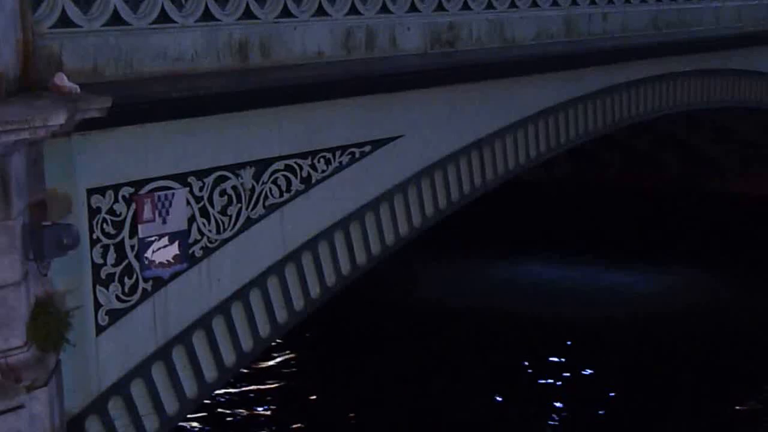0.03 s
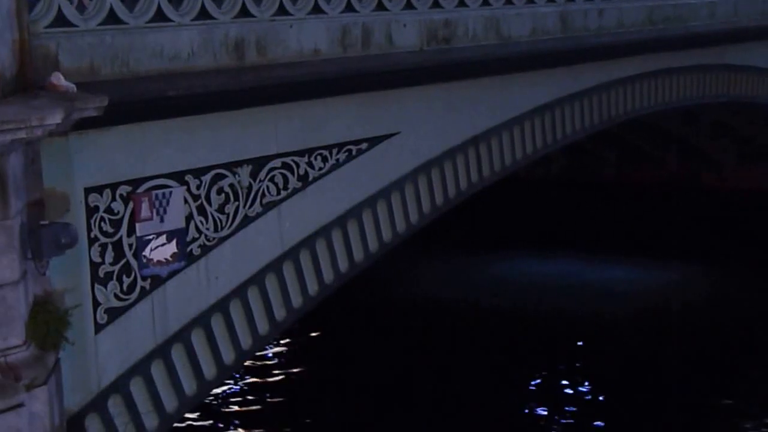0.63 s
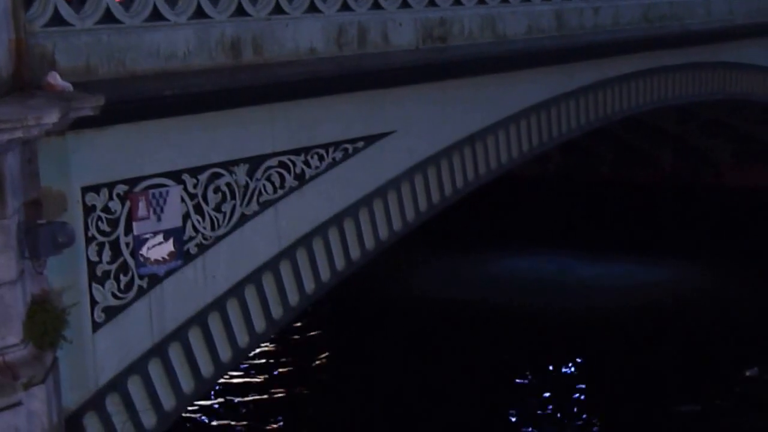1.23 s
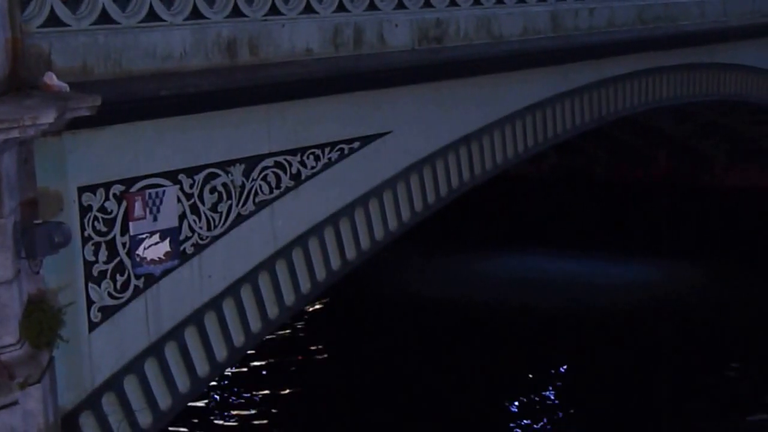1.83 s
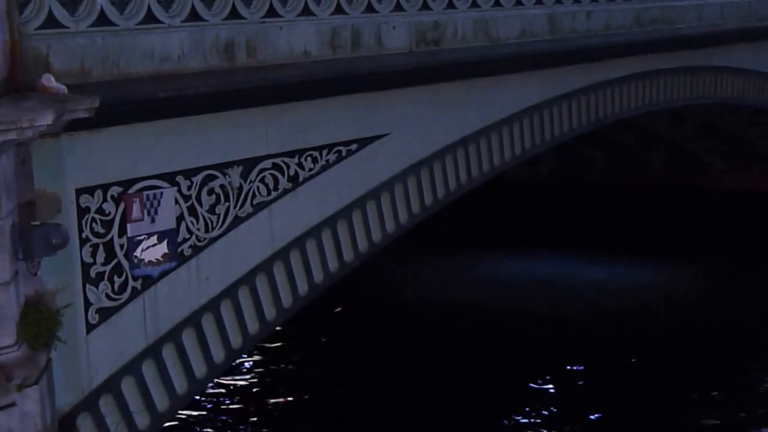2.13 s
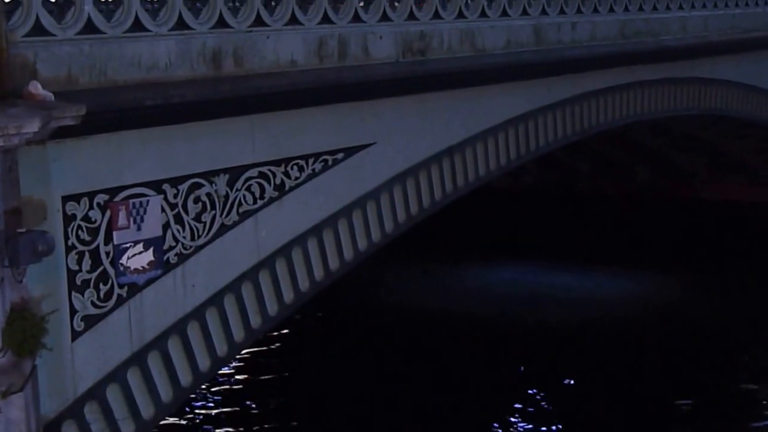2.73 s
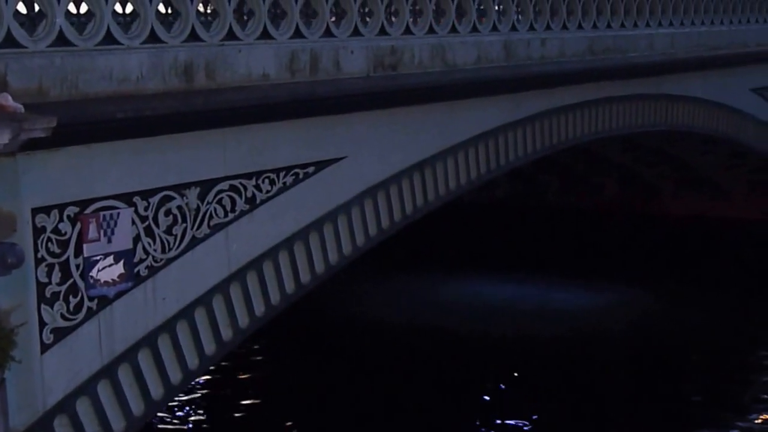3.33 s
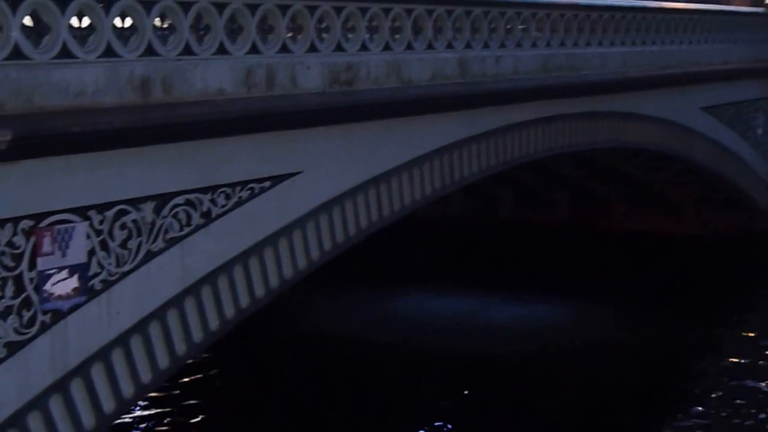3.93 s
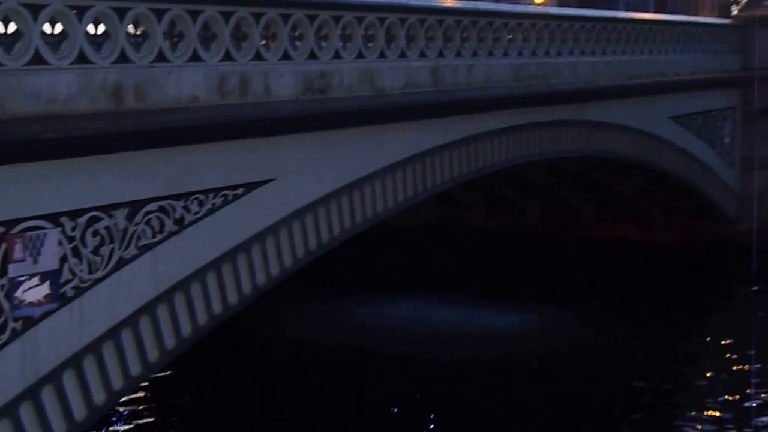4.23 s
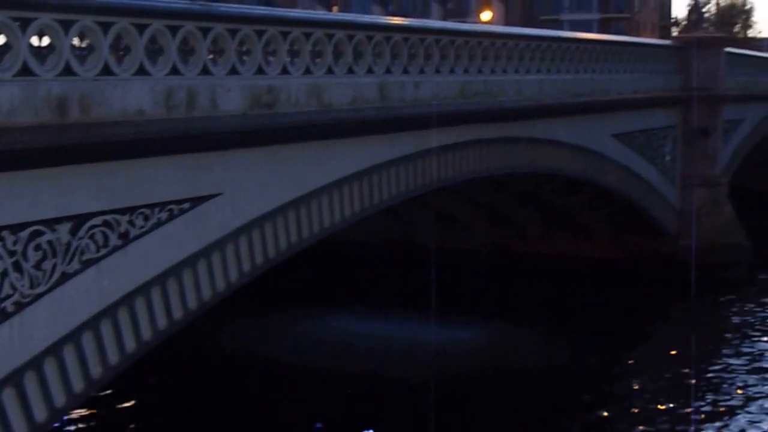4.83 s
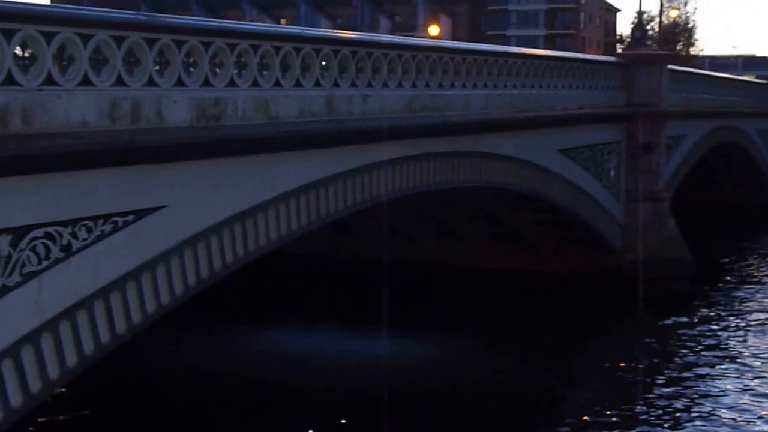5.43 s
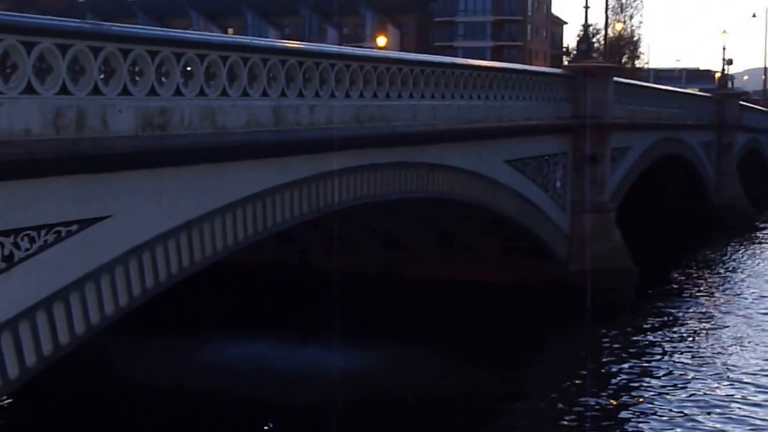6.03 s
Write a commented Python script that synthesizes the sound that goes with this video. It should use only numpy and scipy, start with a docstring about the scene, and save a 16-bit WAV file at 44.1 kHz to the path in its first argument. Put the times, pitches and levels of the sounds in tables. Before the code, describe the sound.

A huge starling flock squeals and chatters under a river bridge, over a steady roar of town traffic.

```python
"""A big starling roost squeals and chatters under an iron river bridge at dusk: thousands of short
gliding, buzzing notes blur in the arch's echo, and a few nearer birds stand out. Town traffic roars
evenly, a light breeze buffets the camera's two microphone ports, and one dry tick sounds close by.
The sound starts half a second in, narrow and deeply notched; later the camera swings to the right."""
import sys
import numpy as np
from scipy import signal
from scipy.fft import rfft, irfft
from scipy.io import wavfile

SR = 44100
rng = np.random.default_rng(int(sys.argv[2]) if len(sys.argv) > 2 else 0)


def materialize(psi):
    """Save the field psi as 16-bit PCM at rate SR to the path in sys.argv[1].

    A 1-D psi becomes a single channel; in a 2-D psi each row is a channel.
    """
    bounded = np.clip(np.atleast_2d(psi).T, -1, 1)
    quanta = np.round(bounded * 32767).astype(np.int16)
    wavfile.write(sys.argv[1], SR, quanta)


N = 268569
TIME_S = np.arange(N) / SR
BINS_HZ = np.fft.rfftfreq(N, 1 / SR)


def gain_of(db):
    """Decibels to amplitude."""
    return 10 ** (np.asarray(db) / 20)


def unit_rms(x):
    """Scales to rms 1."""
    return x / np.sqrt(np.mean(x ** 2) + 1e-20)


def at_hz(points, hz=BINS_HZ):
    """Interpolates a spectrum table over log frequency."""
    knots_hz, values = np.transpose(points)
    return np.interp(np.log(hz + 1), np.log(knots_hz + 1), values)


def at_time(points, t=TIME_S):
    """Interpolates a time table."""
    return np.interp(t, *np.transpose(points))


def add(mix, start_s, sound):
    """Mixes a sound in at start_s."""
    part = mix[max(round(start_s * SR), 0):][:len(sound)]
    part += sound[:len(part)]


def band_noise(centre_hz, width_hz, size=N):
    """Noise in a bell-shaped band, rms 1."""
    hz = np.fft.rfftfreq(size, 1 / SR)
    bell = np.exp(-((hz - centre_hz) / width_hz) ** 2)
    return unit_rms(irfft(rfft(rng.standard_normal(size)) * bell, size))


def stereo_noise(spectrum):
    """Two independent noises, shaped by rows of Hz and dB."""
    return irfft(rfft(rng.standard_normal((2, N))) * gain_of(at_hz(spectrum)), N)


def arch_echo(pair, t60_s, wet_db, build_s=0.022):
    """The vault returns a dense tail, a different one to each side."""
    t = TIME_S[:SR]
    tail = rng.standard_normal((2, SR)) * gain_of(-60 * t / t60_s) * (1 - np.exp(-t / build_s))
    tail /= np.linalg.norm(tail, axis=1, keepdims=True)
    wet = gain_of(wet_db)
    return (pair + wet * signal.fftconvolve(pair, tail, axes=1)[:, :N]) / np.sqrt(1 + wet ** 2)


def traffic(flutter_db=0.22, flutter_hz=14, trim_db=0.88):
    """Tyre roar and street rumble, slightly uneven."""
    # Each row: time in seconds, level in dB before trim.
    levels = [(0.55, -33), (1.5, -34), (2.03, -32.5), (2.5, -34), (3.4, -34), (6.08, -34)]
    # Each row: frequency in Hz, relative density in dB.
    spectrum = [(25, -42), (45, -40.5), (70, -27), (125, -21), (200, -10), (285, -3), (400, -4),
                (550, -3.5), (930, 1.5), (1200, -4), (1600, -9.5), (2200, -8.5), (3200, -25.5), (8000, -38)]
    roar = unit_rms(stereo_noise(spectrum))
    return roar * gain_of(at_time(levels) + trim_db + flutter_db * band_noise(0, flutter_hz))


def chirps(count=1500, mean_length_s=.04, glide_hz=700, buzz_hz=321):
    """Short gliding, buzzing bird notes at random times and pitches."""
    out = np.zeros(N)
    for when, pitch, span, trill in rng.random((count, 4)):
        glide, buzz = rng.standard_normal(2)
        t = TIME_S[:int(SR * mean_length_s * (.5 + span))]
        progress = t / t[-1]
        vibrato_hz = buzz_hz * buzz * np.sin(2 * np.pi * (70 + 200 * trill) * t)
        hz = 1800 + 6500 * pitch + glide_hz * glide * (progress - .5) + vibrato_hz
        note = np.sin(2 * np.pi * np.cumsum(hz) / SR)
        add(out, when * N / SR, progress * (1 - progress) * note)
    return unit_rms(out)


def roost(far_db=0.5, wander_db=.5, wander_hz=4.4, flurry_spread_hz=450):
    """Echoing notes over a blur of far birds; flurries swell as groups call together."""
    # Each row: time in seconds, gain of all registers in dB.
    activity = [(0.55, -2.5), (1.0, -0.7), (1.6, -0.7), (2.4, -0.34), (4.3, 0.3), (4.9, -1.3), (6.08, -0.7)]
    # Chatter, whistles, squeals, shrieks. Each row: centre in Hz, spread in Hz, level in dB, drift in dB/s.
    registers = [(2520, 530, -39.5, 0), (4264, 607, -34.5, 0.12), (6080, 546, -30.5, -0.5),
                 (6994, 613, -36.5, 0.27)]
    # Each row: middle in seconds, length in seconds, pitch in Hz, peak level in dB.
    flurries = [ (0.737, .26, 5950, -32.5), (0.922, 0.72, 2370, -45), (1.95, 0.79, 7130, -37),
                (2.66, 0.49, 2660, -39), (3.598, .2, 5870, -29.5), (3.73, .34, 2480, -38.5),
                (3.74, 0.17, 7100, -36.5), (4.06, 0.27, 7000, -36.5), (4.328, 0.25, 6900, -33.5),
                (4.57, 0.39, 6560, -33), (4.964, 0.095, 6750, -34.5), (5.342, 0.4, 6240, -32),
                (5.908, 0.46, 6560, -34.5)]
    notes = unit_rms(arch_echo(np.array([chirps(), chirps()]), t60_s=0.8, wet_db=0.5))
    far_birds = np.array([band_noise(3500, 5100) for side in range(2)])
    flock = notes + gain_of(far_db) * far_birds
    hz, t, frames = signal.stft(flock, SR, nperseg=512, noverlap=384)
    power = np.mean(abs(frames) ** 2, axis=(0, 2))

    def group(centre_hz, spread_hz, gain):
        """Power gain over frequency and time for the birds around one pitch."""
        bell = np.exp(-.5 * ((hz - centre_hz) / spread_hz) ** 2)
        return np.outer(bell * power.sum() / (bell @ power), gain ** 2)

    power_gain = 0
    for centre_hz, spread_hz, db, drift_db_per_s in registers:
        trend_db = db + at_time(activity, t) + drift_db_per_s * (t - t.mean())
        wander = np.interp(t, TIME_S, band_noise(0, wander_hz))
        power_gain += group(centre_hz, spread_hz, gain_of(trend_db + wander_db * wander))
    for middle_s, length_s, pitch_hz, db in flurries:
        swell = np.cos(np.pi * np.clip((t - middle_s) / length_s, -.5, .5))
        power_gain += group(pitch_hz, flurry_spread_hz, gain_of(db) * swell)
    _, voices = signal.istft(frames * np.sqrt(power_gain), SR, nperseg=512, noverlap=384)
    return voices[:, :N] / flock.std()


def breeze(gust_db=4.0, gust_hz=7.6):
    """Random eddies rumble on each port separately."""
    # Each row: time in seconds, level in dB.
    levels = [(0.55, -59.5), (1.5, -74), (2.1, -57), (3.2, -55), (3.6, -64), (4.4, -72), (5.4, -55.5),
              (6.09, -62.5)]
    # Each row: frequency in Hz, relative density in dB.
    spectrum = [(25, -37), (45, -21.5), (80, -2), (140, 1.5), (300, -5), (600, -14), (1200, -23),
                (4000, -52.5)]
    air = stereo_noise(spectrum)
    eddies = gain_of(gust_db * band_noise(0, gust_hz))
    return unit_rms(air * eddies) * gain_of(at_time(levels))


def near_birds(rasp_scale=.8, rasp_rate_hz=330):
    """Squeals and thin whistles: gliding tones, made raspy by pitch jitter."""
    # Each row: start and length in seconds, pitch and glide in Hz, dry level in dB, unscaled rasp in Hz.
    calls = [ (0.655, .05, 6050, -100, -35, 200), (0.80, .07, 6150, -400, -36, 300),
             (1.46, .05, 5500, 150, -38, 250), (1.862, .04, 3680, -30, -34, 45),
             (1.91, .07, 3670, 0, -38, 45), (2.38, .07, 4750, -400, -40, 250),
             (3.00, .075, 6700, 250, -31, 220), (3.36, .08, 5550, -150, -35, 300),
             (3.56, .09, 5850, -100, -35, 300), (4.00, .07, 7000, 300, -37, 400),
             (4.33, .05, 6860, 0, -33, 100), (5.81, .04, 6930, 60, -37, 120),
             (5.86, .08, 7300, -100, -38, 300), (6.055, .05, 3790, 0, -37, 75)]
    out = np.zeros(N)
    for start_s, length_s, pitch_hz, glide_hz, db, rasp_hz in calls:
        progress = np.linspace(0, 1, int(SR * length_s))
        jitter_hz = rasp_scale * rasp_hz * band_noise(0, rasp_rate_hz, size=16384)[:len(progress)]
        hz = pitch_hz + glide_hz * (progress - .5) + jitter_hz
        note = np.sin(2 * np.pi * np.cumsum(hz) / SR)
        swell = np.sqrt(4 * progress * (1 - progress))
        add(out, start_s, gain_of(db) * unit_rms(note * swell))
    return arch_echo(np.array([out, .5 * out]), t60_s=0.63, wet_db=-7)


def tick():
    """One dry tick close by: a noise burst that dies at once."""
    # In order: start in seconds, centre in Hz, width in Hz, initial rms in dB, t60 in seconds.
    burst = (0.767, 2000, 1050, -26.5, .025)
    start_s, centre_hz, width_hz, db, t60_s = burst
    out, t = np.zeros(N), TIME_S[:4096]
    add(out, start_s, band_noise(centre_hz, width_hz, size=len(t)) * gain_of(db - 60 * t / t60_s))
    return out


def puffs():
    """The strongest eddies buffet each port separately; faster air sounds higher."""
    # Each row: start in seconds, length in seconds, level in dB, frequency factor on the spectrum.
    eddies = [ (0.801, 0.027, -28.5, 1.65), (0.825, 0.048, -31.5, 1.42), (3.131, 0.1, -40.5, 1.07)]
    # Each row: frequency in Hz, relative density in dB.
    spectrum = [(25, -26), (45, -20), (80, -8), (130, 1), (200, 3), (330, -5), (600, -11), (1200, -25),
                (4000, -57)]
    out = np.zeros((2, N))
    hz = np.fft.rfftfreq(SR, 1 / SR)
    t = TIME_S[:SR] - .5  # one second, centred on the puff
    for start_s, length_s, db, pitch_factor in eddies:
        swell = np.cos(np.pi * np.clip(t / length_s, -.5, .5)) ** 2
        colour = gain_of(at_hz(spectrum, hz / pitch_factor))
        air = irfft(rfft(swell * rng.standard_normal((2, SR))) * colour)
        for port, rumble in zip(out, air):
            gain = gain_of(db) * np.linalg.norm(swell) / np.linalg.norm(rumble)
            add(port, start_s + length_s / 2 - .5, gain * rumble)
    return out


def microphone_ports(pair):
    """Two close ports hear mostly the same sound; the camera body shifts phase and level as it turns."""
    # Each row: frequency in Hz, left-right coherence.
    coherence = [(30, .998), (280, .998), (450, .988), (750, .975), (1000, .94), (1550, .79), (2100, .88),
                 (2700, .83), (3200, .66), (3700, .79), (4400, .78), (5200, .58), (5900, .87), (6600, .88),
                 (7900, .66)]
    # Each row: frequency in Hz, left phase lead in radians.
    lead = [(250, 0), (650, .06), (950, .14), (1350, .11), (1700, .35), (2200, .53), (2850, 1.0),
            (3150, .65), (3400, 0), (5100, -.12), (5550, .42), (6500, .22), (7000, 0), (7700, -.27)]
    # Each row: frequency in Hz, left over right in dB.
    balance = [(300, 0), (1300, -.2), (2000, -3.3), (2550, -3.3), (3250, 2.7), (4000, -1), (4700, -2),
               (5350, -4.2), (6000, -1.4), (6900, -.1), (7900, -.6)]
    # A right turn puts the roost on the left. Each row: time in seconds, share of the turn.
    turn = [(2.8, 0), (4.0, 0.33), (5.2, 1.04), (6.09, 1.14)]
    # Added at share 1. Each row: frequency in Hz, left over right in dB, left lead in radians.
    turn_shift = [(900, 0, 0), (2200, 2.4, 0), (2900, 3.4, .45), (3350, 3.8, -.45), (4900, 4.6, -.2),
                  (5400, 2.8, -.5), (5900, -.4, .1), (6800, 1.8, .65), (7450, 5.2, .5), (8000, 2, .1)]
    mid, side = rfft(pair)
    mid *= np.sqrt((1 + at_hz(coherence)) / 2)
    side *= np.sqrt((1 - at_hz(coherence)) / 2)

    def heard(tilt):
        """Left and right signals under opposite complex gains."""
        return irfft(np.array([(mid + side) * tilt, (mid - side) / tilt]), N)

    ahead = gain_of(at_hz(balance) / 2) * np.exp(.5j * at_hz(lead))
    hz, shift_db, shift_rad = np.transpose(turn_shift)
    shift = gain_of(np.interp(BINS_HZ, hz, shift_db) / 2) * np.exp(.5j * np.interp(BINS_HZ, hz, shift_rad))
    facing, turned = heard(ahead), heard(ahead * shift)
    return facing + at_time(turn) * (turned - facing)


def scene():
    """Traffic and birds from across the water; tick and wind at the camera."""
    return microphone_ports(traffic() + roost() + near_birds()) + tick() + puffs() + breeze()


def record(dry, camera_rate_hz=16000, start_s=0.535, fade_s=0.003, cutoff_hz=8200):
    """Notch filters at the camera's low sample rate, an abrupt start, then the band limit."""
    # Each row: centre in Hz, width in Hz.
    notches = [(2605, 796), (4603, 750), (5432, 585), (7912, 266)]
    response = np.ones(len(BINS_HZ), complex)
    for centre_hz, width_hz in notches:
        b, a = signal.iirnotch(centre_hz, centre_hz / width_hz, camera_rate_hz)
        response *= signal.freqz(b, a, BINS_HZ, fs=camera_rate_hz)[1]
    notched = irfft(rfft(dry) * response, N)
    fade_in = np.clip((TIME_S - start_s) / fade_s, 0, 1)
    lowpass = signal.firwin(241, cutoff_hz, window=("kaiser", 9), fs=SR)
    return signal.oaconvolve(notched * fade_in, lowpass[None], "same")


dry = scene()
out = record(dry)
materialize(out)
```